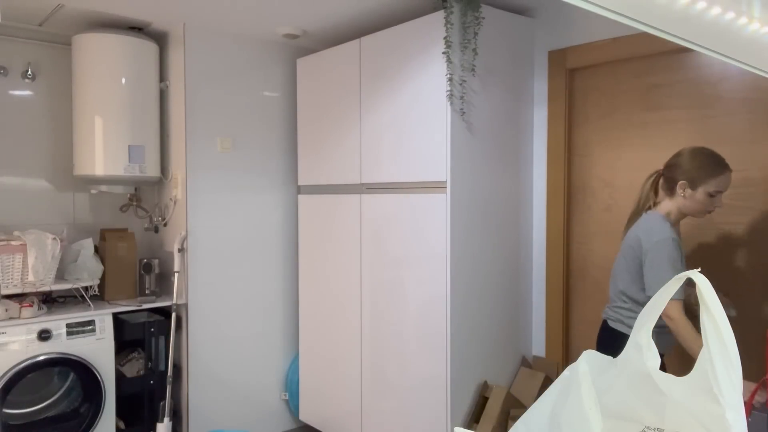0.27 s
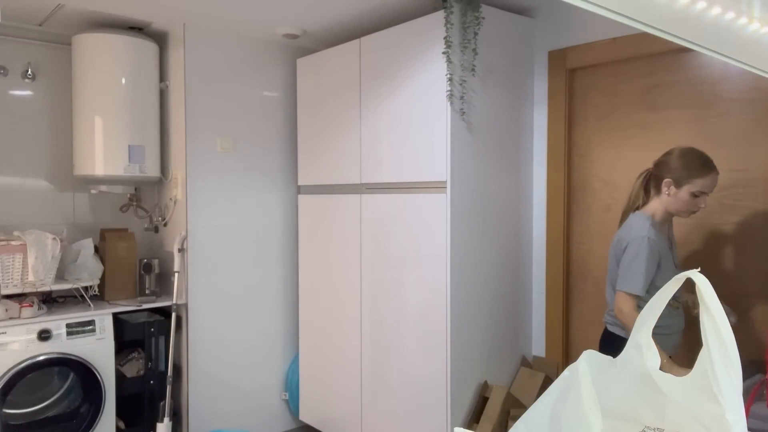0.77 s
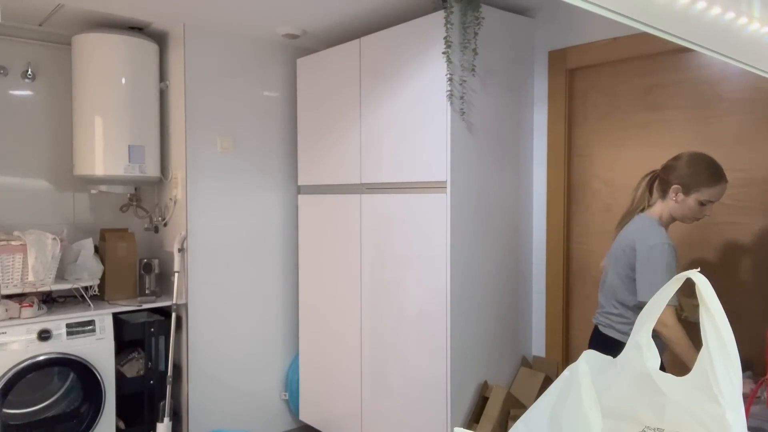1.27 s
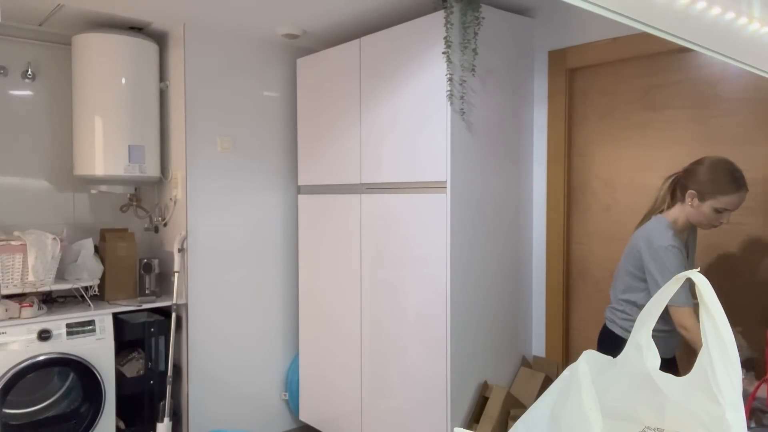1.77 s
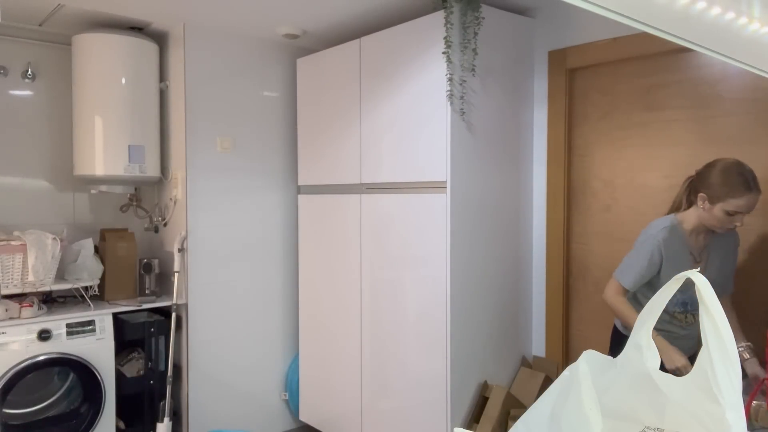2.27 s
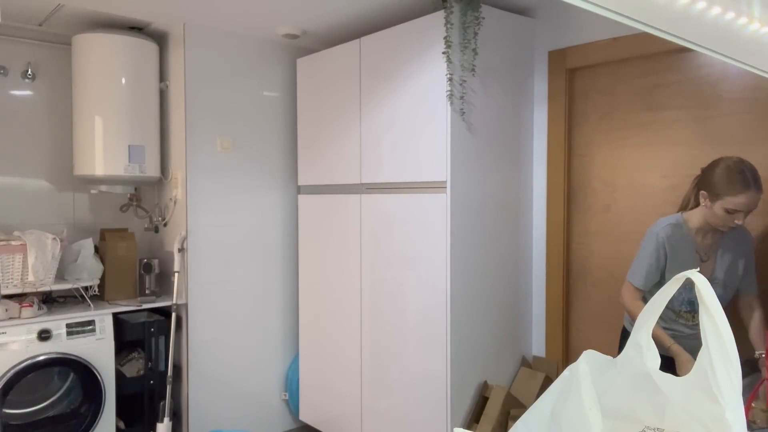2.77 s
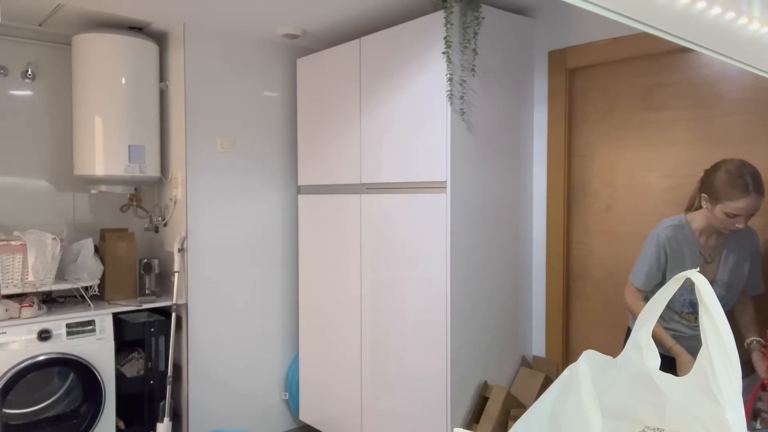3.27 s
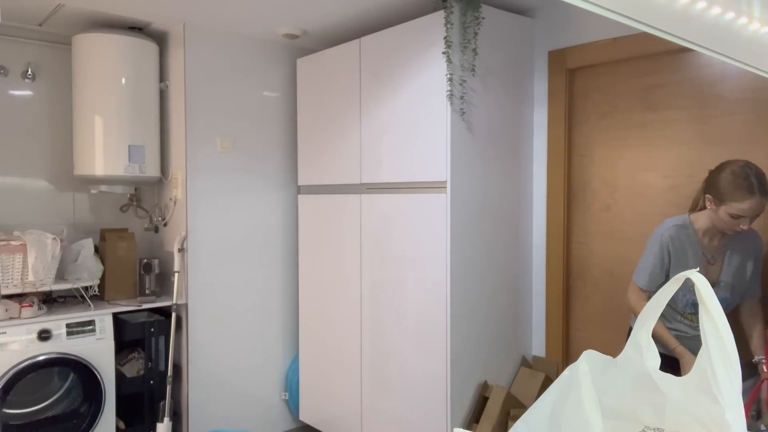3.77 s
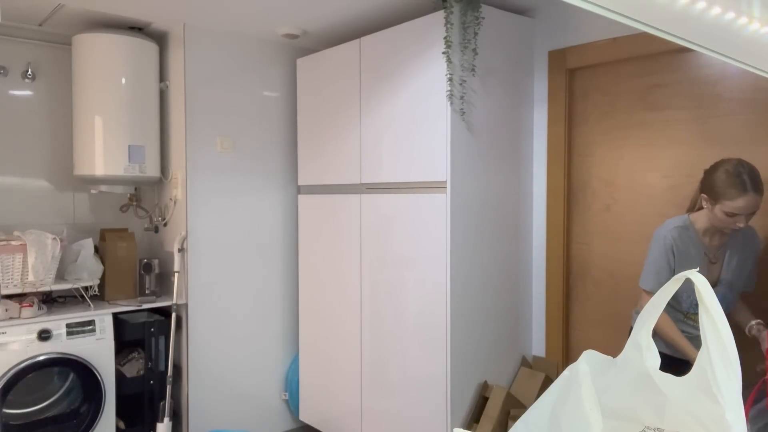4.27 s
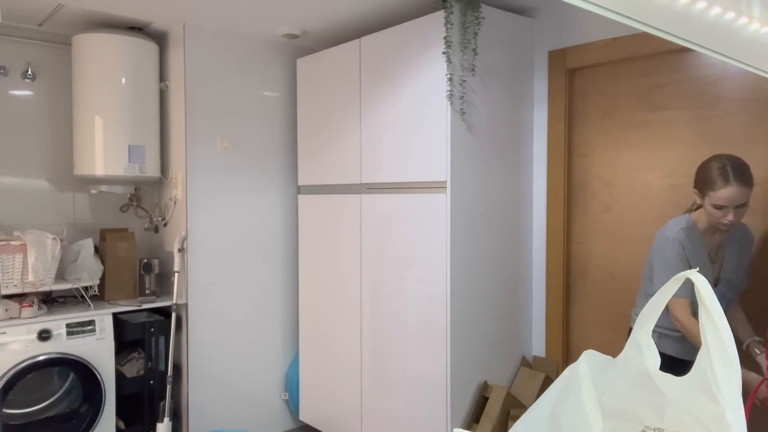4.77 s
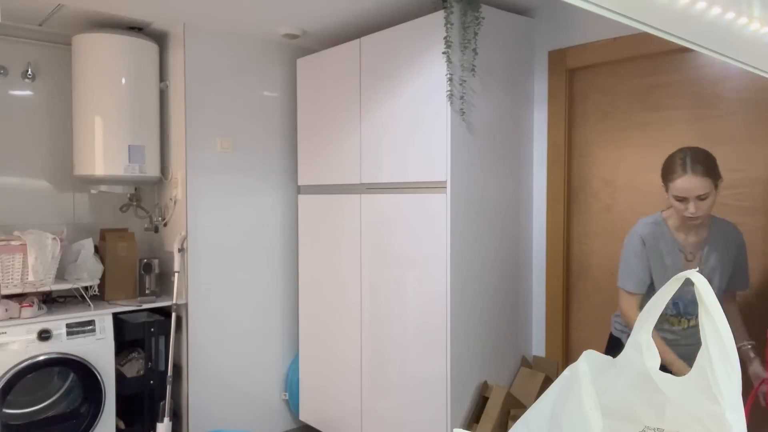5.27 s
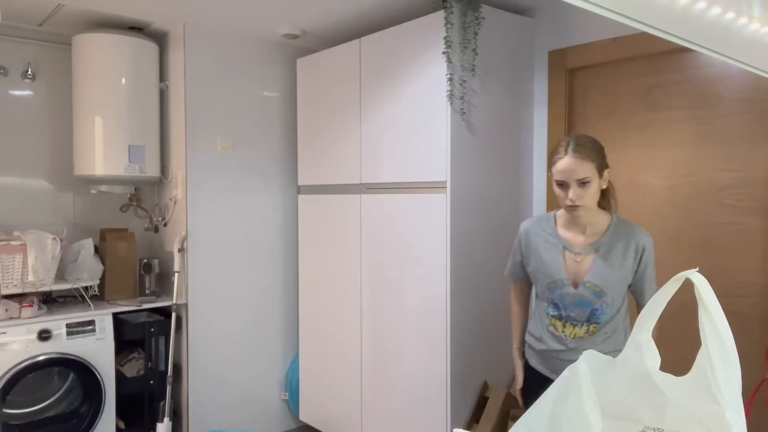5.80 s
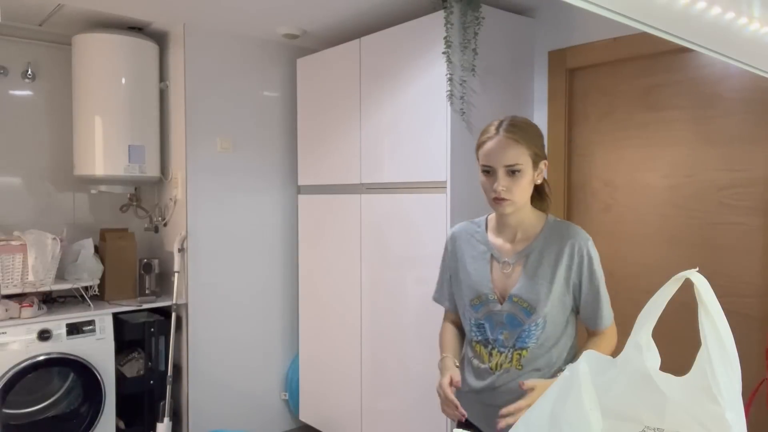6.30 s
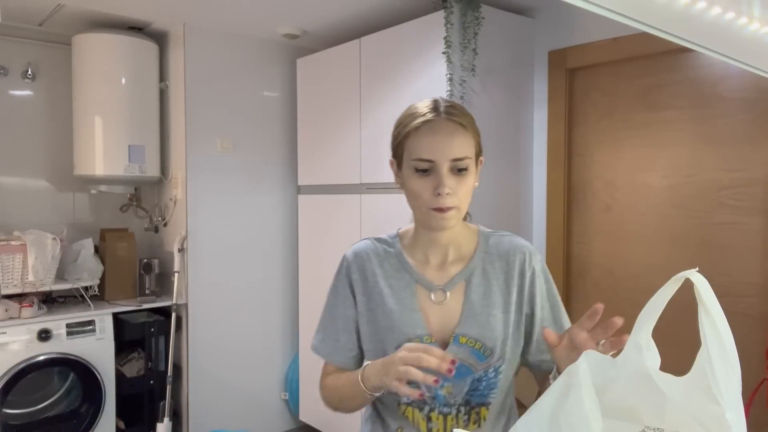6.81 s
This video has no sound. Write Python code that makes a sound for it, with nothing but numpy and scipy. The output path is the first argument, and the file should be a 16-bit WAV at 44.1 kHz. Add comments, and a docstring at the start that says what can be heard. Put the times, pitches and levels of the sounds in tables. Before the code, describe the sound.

A freezer hums and booms low in a small tiled room with a short echo, heard through a phone, slightly from the right. For the first second, plastic drawers bump and slide while frozen packets scrape lightly. From about 1.2 to 1.9 seconds comes a loud cluster of hollow knocks and scraping, sharpest at 1.5. Between 2 and 4 seconds stiff wrappers crinkle and snap in uneven bursts as they are pushed in, strongest around 3.3. A drawer knocks and rubs at about 4.3 seconds, and the hum fades. At 4.9 the door shuts with a deep, sharp thump, the loudest sound, and a brief hiss from its seal. From 5.4 seconds to the end at about 7, someone takes soft steps, with a light rustle of clothes and a plastic bag and a few very faint squeaks.

```python
"""A small tiled utility room. Stiff frozen packets crinkle and scrape as they are pushed into a freezer's
plastic drawers, which slide and knock, while the open cabinet booms low and its motor hums.
The door thumps shut on its hissing seal, and someone steps away with a rustle of clothes and faint
squeaks. The tiles add a short tail; a phone with two microphone ports listens."""
import sys
import numpy as np
from scipy import signal
from scipy.fft import rfft, irfft, next_fast_len
from scipy.io import wavfile
from scipy.ndimage import uniform_filter1d, map_coordinates

SR = 44100
rng = np.random.default_rng(int(sys.argv[2]) if len(sys.argv) > 2 else 0)


def wav_record(signal):
    """Record a signal, one row per channel, as 16-bit PCM in the file named by sys.argv[1]."""
    frames = np.transpose(np.atleast_2d(signal))
    bounded = np.clip(frames, -1, 1)
    # unit amplitude maps onto the largest positive 16-bit level
    quanta = np.round(bounded * 32767).astype(np.int16)
    wavfile.write(sys.argv[1], SR, quanta)


N = 310860

# modes of a plastic drawer: (pitch [Hz], width [Hz], level [dB])
DRAWER_MODES = [(294, 57, -1.5), (346.6, 41.6, 4.5), (393.2, 51, 4), (492, 47, 3.5), (571, 32, -0.5),
                (662, 180, -13.5)]
# low modes of the air in cabinet and room: (pitch [Hz], width [Hz], level [dB])
AIR_MODES = [(45, 12, -4.5), (57, 13.1, 0.5), (72.3, 17.8, -1.5), (102.5, 18, -5.5)]
# modes of the cabinet walls: (pitch [Hz], width [Hz], level [dB])
WALL_MODES = [(124, 25, -1.5), (147.3, 24.2, 4), (181.3, 25.5, -0.5), (256.3, 13.2, 0.5)]
# colour of a scraping packet or shoe: (frequency [Hz], level [dB])
SCRAPE_SPECTRUM = [(350, -20.5), (650, -3), (1000, 0.5), (1400, -4.5), (2000, -6.5), (3500, -17.5),
                   (8000, -45.5)]


def amp(db):
    """Gain of a level in dB."""
    return 10 ** (np.asarray(db) / 20)


def unit(x):
    """x at rms 1."""
    return x / np.sqrt(np.mean(x ** 2) + 1e-20)


def along(points, hz):
    """Read (Hz, value) points on a log frequency axis."""
    f, v = np.transpose(points)
    return np.interp(np.log(hz + 1), np.log(f + 1), v)


def curves(rows):
    """One automation curve for each column after the time."""
    times, *columns = np.transpose(rows)
    return [np.interp(np.arange(N) / SR, times, column) for column in columns]


def wobble(rate):
    """A smooth random curve, rate knots a second."""
    knots = rng.standard_normal(int(N * rate / SR) + 4)
    return map_coordinates(knots, [np.arange(N) * rate / SR])


def noise():
    """Two unrelated noises, for the mid and the side of the image."""
    return rng.standard_normal((2, N))


def filtered(x, response):
    """x times a complex response of frequency."""
    size = next_fast_len(N + SR // 2)
    return irfft(rfft(x, size) * response(np.fft.rfftfreq(size, 1 / SR)), size)[..., :N]


def coloured(x, spectrum):
    """x through a spectrum, at rms 1."""
    return unit(filtered(x, lambda hz: amp(along(spectrum, hz))))


def resonant(x, modes):
    """x through resonances of alternating sign; white noise keeps its rms."""
    def response(f):
        h = sum((-1) ** k * amp(db) * 1j * f * width / (hz * hz - f * f + 1j * f * width)
                for k, (hz, width, db) in enumerate(modes))
        return h / np.sqrt(np.mean(np.abs(h) ** 2))
    return filtered(x, response)


def patchy(x, depth_db):
    """x with random patches of gain in time and frequency."""
    spectra = signal.stft(x, nperseg=256)[2]
    field = uniform_filter1d(rng.standard_normal(spectra.shape[1:]), size=7, axis=0)
    field = uniform_filter1d(field, size=12, axis=1)
    return signal.istft(spectra * amp(depth_db * unit(field)), nperseg=256)[1][:, :N]


def burst(s, rise, t60):
    """An envelope that swells from time s and dies away, half a second at most."""
    out, start = np.zeros(N), round(s * SR)
    t = np.arange(min(SR // 2, N - start)) / SR
    out[start:start + len(t)] = (1 - np.exp(-t / rise)) * amp(-60 * t / t60)
    return out


def blows(rows):
    """Summed bursts of (time [s], levels [dB], rise [s], t60 [s]) rows, one envelope per level."""
    return sum(amp(db)[:, None] * burst(s, rise, t60) for s, db, rise, t60 in rows)


def room_tone():
    """A steady, dark bed of noise."""
    # colour of the bed: (frequency [Hz], level [dB])
    spectrum = [(18, -34.5), (30, -5.5), (86, -6.5), (304, -32), (350, -18), (424, -36), (490, -34.5),
                (1270, -46.5), (1910, -46), (2480, -53.5), (9000, -62), (11700, -77.5), (19800, -120)]
    return amp(-46.5) * coloured(noise(), spectrum)


def cabinet():
    """Movement stirs the low air and the walls, the motor hums unevenly, runners rumble in the drawer."""
    # shaking by drawers and feet: (time [s], air boom [dB], wall drone [dB], drawer rumble [dB])
    shaking = [(0.0, -25.5, -41, -33.5), (0.41, -42, -32.5, -35), (0.59, -36, -29.5, -28.5),
               (0.75, -35, -46.5, -44.5), (1.2, -35, -45, -62.5), (1.37, -41.5, -38.5, -39),
               (1.6, -35.5, -31.5, -38), (1.9, -35, -53.5, -71.5), (2.14, -36, -42, -40),
               (2.5, -38, -49, -53.5), (2.86, -34, -39.5, -39.5), (3.04, -35, -45.5, -48),
               (3.67, -35, -40.5, -38.5), (3.98, -38, -43.5, -41.5), (4.2, -39.5, -32, -38),
               (4.29, -35.5, -30, -34.5), (4.34, -28, -22.5, -37.5), (4.45, -35, -45, -37.5),
               (4.67, -35, -37.5, -41.5), (4.88, -34.5, -46, -40.5), (5.0, -34.5, -34.5, -51),
               (5.07, -20.5, -39.5, -56), (5.12, -31.5, -48, -66), (5.3, -38.5, -52.5, -67),
               (5.52, -50, -51, -62.5), (6.3, -48, -47, -59.5), (7.05, -71, -51, -68.5)]
    boom_db, drone_db, rumble_db = curves(shaking)
    hum_hz, wander_hz, hum_end_s, fade_s = 76, 3.48, 4.44, 0.45
    hum_share = 0.96 * np.clip((hum_end_s - np.arange(N) / SR) / fade_s, 0, 1)
    hum = np.sqrt(2) * np.sin(2 * np.pi * np.cumsum(hum_hz + wander_hz * wobble(11)) / SR)
    boom_gain = amp(boom_db + 0.97 * wobble(25))
    boom = boom_gain * (hum_share * hum + np.sqrt(1 - hum_share ** 2) * resonant(noise(), AIR_MODES))
    drone = amp(drone_db + 2.5 * wobble(25)) * resonant(noise(), WALL_MODES)
    rumble = amp(rumble_db + 2.6 * wobble(30)) * resonant(noise(), DRAWER_MODES)
    return boom + drone + rumble


def grips():
    """Crinkle, scrape and fizz envelopes: each grip swells, holds and lets go, and their powers add."""
    # handling of packets, later of clothes and bag:
    # (start [s], rise [s], hold [s], crinkle [dB], scrape [dB], fizz [dB])
    gestures = [(0.0, 0.00057, 0.028, -48, -34.5, -51), (0.092, 0.071, 0.14, -53, -41.5, -55.5),
                (0.252, 0.0027, 0.033, -37, -34, -43.5), (0.349, 0.034, 0.13, -85, -44.5, -64),
                (0.534, 0.036, 0.0025, -36.5, -30.5, -35.5), (0.705, 0.095, 0.066, -57.5, -47.5, -64.5),
                (0.914, 0.0044, 0.062, -58, -47, -74.5), (1.0, 0.037, 0.19, -68, -55, -72.5),
                (1.187, 0.044, 0.022, -48.5, -36.5, -65.5), (1.226, 0.055, 0.14, -38.5, -31.5, -42.5),
                (1.294, 0.048, 0.0055, -35.5, -27, -33), (1.448, 0.018, 0.027, -24, -15.5, -37.5),
                (1.62, 0.024, 0.015, -44.5, -49, -44.5), (1.72, 0.12, 0.012, -44.5, -37, -57.5),
                (1.966, .02, 0.057, -42, -53.5, -51), (2.079, 0.036, 0.15, -36, -40, -37),
                (2.13, 0.098, 0.036, -25.5, -32, -29.5), (2.456, 0.027, 0.018, -41.5, -48.5, -37),
                (2.485, 0.088, 0.002, -37.5, -42, -41.5), (2.602, 0.11, 0.065, -35, -40, -35),
                (2.72, 0.079, 0.19, -31.5, -38.5, -31.5), (3.018, 0.0062, 0.14, -38.5, -53, -38.5),
                (3.138, 0.17, 0.0037, -32, -38, -29), (3.281, 0.083, 0.0048, -24, -29, -24.5),
                (3.459, 0.12, 0.079, -27.5, -33.5, -26), (3.735, 0.041, 0.16, -33, -38, -35.5),
                (3.908, 0.053, 0.11, -38.5, -42.5, -41.5), (4.061, 0.032, 0.15, -48.5, -41.5, -56.5),
                (4.251, 0.081, 0.03, -39, -35.5, -40.5), (4.391, 0.015, 0.24, -37.5, -38, -41.5),
                (4.586, 0.011, 0.28, -40.5, -37, -41.5), (4.872, 0.016, 0.038, -34.5, -29, -76),
                (4.947, 0.017, 0.08, -67, -61.5, -74), (5.423, 0.0045, 0.072, -62.5, -58, -78.5),
                (5.553, 0.0091, 0.11, -64, -71, -60), (5.738, 0.041, 0.13, -64, -62, -61.5),
                (5.891, .02, 0.044, -62.5, -61, -66), (5.975, 0.036, 0.075, -59.5, -48, -55),
                (6.104, 0.0082, 0.086, -62, -54.5, -67), (6.221, 0.0057, 0.12, -66.5, -60, -64),
                (6.444, 0.048, 0.26, -80, -62, -73), (6.63, 0.12, 0.054, -57.5, -48, -66.5),
                (6.837, 0.022, 0.08, -60.5, -56, -61.5), (6.976, 0.013, .06, -58, -57, -48)]
    rest_db, release_db_per_s = (-80, -68.5, -76), (118.5, 149.5, 161)  # crinkle, scrape, fizz
    t = np.arange(0, N / SR, 0.001)
    power = amp(rest_db)[:, None] ** 2
    for s, rise, hold, *db in gestures:
        fade_db = np.outer(release_db_per_s, np.clip(t - s - rise - hold, 0, None))
        swell = np.clip((t - s) / max(rise, 1e-3), 0, 1) ** 2
        power = power + (swell * amp(np.array(db)[:, None] - fade_db)) ** 2
    return [np.interp(np.arange(N) / SR, t, layer) for layer in np.sqrt(power)]


def packets():
    """Frozen film buckles in dense, uneven clumps of clicks; heavy packets scrape."""
    # single snaps of the film: (time [s], level [dB])
    snap_cues = [(0.249, -38), (0.9217, -62), (0.5405, -48), (0.562, -46), (1.3166, -38.5), (1.4667, -31.5),
                 (1.9808, -48.5), (2.11, -43), (2.1997, -35), (2.4523, -45), (2.464, -37.5), (2.541, -33),
                 (2.6656, -46), (2.709, -36), (3.041, -29.5), (3.139, -49), (3.2123, -33.5), (3.545, -38),
                 (3.868, -38.5), (4.2923, -44), (4.414, -46), (4.8877, -43), (5.095, -55), (5.9836, -58),
                 (6.9842, -63.5)]
    # colour of the crinkle: (frequency [Hz], level [dB])
    film_spectrum = [(900, -27.5), (1500, -0.5), (2200, 4), (4000, 2.5), (7000, 0.5), (9000, -6.5),
                     (11000, -28)]
    # colour of the top-octave fizz: (frequency [Hz], level [dB])
    fizz_spectrum = [(7500, -13.5), (10000, -2.5), (11500, -5), (14000, -10), (16000, -6.5)]
    # each packet has its own brightness: (time [s], treble over middle [dB])
    brightness = [(0.0, 9.5), (0.25, 2), (0.55, 5.5), (0.75, 0), (0.95, -9.5), (1.15, -3), (1.3, 2.5),
                  (1.5, -1), (1.8, 2.5), (2.0, -0.5), (2.25, 0), (2.46, -1.5), (2.55, 8.5), (2.65, 2),
                  (2.8, 2.5), (3.0, 4), (3.15, 0), (3.25, 7.5), (3.37, -1.5), (3.5, 6), (3.65, -1.5),
                  (3.9, -1), (4.2, 2), (4.42, 0.5), (4.5, 5), (4.9, 1), (5.5, -2.5), (6.2, 2.5), (7.05, 2)]
    crossover_hz = 3800
    crinkle, scrape, fizz = grips()
    clicks = patchy(noise() * amp(0.9 * rng.exponential(size=N)), depth_db=1.3)
    snaps, = blows([(s, [db], 0.0008, 0.05) for s, db in snap_cues])
    buckling = amp(0.3 * wobble(25) + 0.19 * wobble(140)) + snaps / crinkle
    body = coloured(clicks, film_spectrum)
    middle = filtered(body, lambda hz: 1 / (1 + (hz / crossover_hz) ** 4))
    tilt_db, = curves(brightness)
    tinted = amp(-tilt_db / 2) * middle + amp(tilt_db / 2) * (body - middle)
    film = buckling * (crinkle * tinted + fizz * coloured(clicks, fizz_spectrum))
    drag = scrape * amp(0.52 * wobble(50))
    return film + drag * coloured(patchy(noise(), depth_db=1.5), SCRAPE_SPECTRUM)


def knocks():
    """A firm, rough push shakes drawer and walls, moves the low air, and slaps and rings the front."""
    # packets and drawers landing, soft packets more slowly:
    # (time [s], drawer [dB], walls [dB], slap [dB], thud [dB], rise [s])
    hits = [(0.041, -31.5, -21.5, -46, -32.5, 0.0016), (0.122, -36, -38, -35, -16, 0.0018),
            (0.127, -33.5, -39, -42, -9.5, 0.015), (0.213, -33.5, -25, -44.5, -14, 0.0045),
            (0.2508, -34, -45, -25, -35, 0.001), (0.363, -20.5, -27, -36, -23.5, 0.0025),
            (0.462, -29, -31, -37.5, -28, .001), (0.497, -31, -37, -33.5, -36, 0.0051),
            (0.564, -21.5, -35, -44.5, -29, 0.0012), (0.7, -30.5, -18.5, -35.5, -28.5, 0.0022),
            (0.921, -58, -40.5, -42.5, -35, 0.003), (1.195, -24, -37, -34, -35, 0.0055),
            (1.279, -14.5, -15.5, -35, -12.5, 0.011), (1.303, -10.5, -22.5, -28, -22, 0.0013),
            (1.314, -13.5, -18, -14.5, -22, 0.0037), (1.334, -9.5, -15.5, -31.5, -7, 0.017),
            (1.407, -33.5, -21, -38.5, -18.5, 0.0082), (1.461, -1.5, -23.5, -14, -22.5, 0.0015),
            (1.469, -6.5, -20, -10, -24, 0.0034), (1.485, -13.5, -24, -6.5, -22, 0.0029),
            (1.498, -13, -23, -16, -28.5, 0.0013), (1.507, -15, -22.5, -20.5, -37, 0.00088),
            (1.524, -34, -35.5, -19, -27, 0.002), (1.612, -32, -40.5, -26.5, -36.5, 0.0016),
            (1.764, -17.5, -18, -35.5, -17, 0.0098), (1.803, -21.5, -18, -37, -37.5, 0.0064),
            (1.813, -20.5, -17, -33.5, -28.5, 0.0022), (1.821, -25.5, -25.5, -26, -38.5, 0.00061),
            (1.838, -16, -30, -36, -33.5, 0.0045), (2.209, -19, -18.5, -18.5, -28, 0.04),
            (2.738, -25.5, -28, -31.5, -28, 0.1), (3.307, -16, -17, -27, -33.5, 0.037),
            (3.352, -33.5, -25.5, -14, -20.5, 0.019), (3.598, -31, -24, -21, -29, 0.066),
            (3.644, -28.5, -40.5, -36, -34, 0.00093), (3.796, -35.5, -25.5, -31.5, -42, 0.032),
            (4.286, -29.5, -23, -28.5, -24, 0.002), (4.31, -26, -8.5, -25.5, -20.5, 0.0025),
            (4.32, -20, -18.5, -39, -23, 0.0016), (4.34, -21.5, -19.5, -24.5, -23, 0.0029),
            (4.363, -22.5, -36.5, -30, -28, 0.0032), (4.386, -24.5, -16.5, -28, -48, 0.002),
            (4.409, -28.5, -21.5, -37, -24, 0.0025), (4.426, -38, -24, -27, -30, 0.0039),
            (4.505, -34, -32.5, -56, -24, 0.0027), (4.885, -33, -12.5, -39, -20.5, 0.0034),
            (4.898, -17, -22, -23.5, -16, 0.0021), (4.964, -43, -32, -45, -19, 0.0019)]
    # modes of the drawer front: (pitch [Hz], width [Hz], level [dB])
    front_modes = [(760, 23, -13), (893, 26, -6), (1004, 23, 9.5), (1140, 40, -13), (1370, 50, -9.5),
                   (1690, 110, -16), (2050, 56, -6), (2494, 60, -9)]
    # colour of the slap: (frequency [Hz], level [dB])
    slap_spectrum = [(450, -11), (650, 6.5), (800, 24.5), (1000, 20), (1300, 12), (2000, -6), (4000, -21.5),
                     (9000, -39.5), (16000, -28.5)]
    contact_t60_s, t60_per_rise = 0.054, 4  # the slower the push, the longer the contact
    contacts = [(s, db, rise, contact_t60_s + t60_per_rise * rise) for s, *db, rise in hits]
    push, shake, slap, thud = blows(contacts)
    rough, firm = noise(), np.array([[1], [-0.6]])  # mid and side: the push is heard from the right
    drawer = resonant(push * (rough + 2.1 * firm), DRAWER_MODES)
    walls = resonant(shake * (rough + 0.47 * firm), WALL_MODES)
    air = resonant(thud * (rough + 0.5 * firm), AIR_MODES)
    front = amp(-6.5) * resonant(slap * noise(), front_modes)
    return drawer + walls + air + front + slap * coloured(noise(), slap_spectrum)


def gasket():
    """Air hisses past the door seal."""
    # rushes of air: (time [s], level [dB], t60 [s])
    rushes = [(0.527, -38, 0.45), (4.887, -29, 0.35)]
    # band of the hiss: (centre [Hz], width [Hz], level [dB])
    hiss_band = [(5730, 1600, 0)]
    flow = sum(amp(db) * burst(s, rise=0.03, t60=t60) for s, db, t60 in rushes)
    return flow * resonant(resonant(noise(), hiss_band), hiss_band)


def brief_resonances():
    """Brief bands of resonant noise: rubs, a dull tap, ringing footfalls and faint low tones."""
    # noise bands: (time [s], rise [s], t60 [s], pitch [Hz], width [Hz], level [dB])
    bands = [(0.92, 0.0033, .25, 2100, 1350, -49), (1.245, 0.0057, .08, 1100, 201.5, -41),
             (4.41, .04, 0.38, 2400, 350, -33), (4.415, .02, 0.31, 930, 91.3, -38.5),
             (4.61, .015, .1, 1310, 246, -38.5), (4.9, 0.0082, .15, 2310, 310, -33.5),
             (5.43, .008, 0.12, 1550, 200, -52), (5.575, .015, 0.23, 850, 200, -52.5),
             (6.255, 0.018, .4, 506, 25, -52), (6.5, 0.073, 0.94, 345, 13, -48),
             (6.765, 0.012, 0.17, 850, 72, -47)]
    return sum(resonant(amp(db) * burst(s, rise, t60) * noise(), [(hz, width, 0)])
               for s, rise, t60, hz, width, db in bands)


def catch():
    """A catch clicks: a short rattle rings its hard plastic."""
    # upper modes of the catch: (pitch [Hz], width [Hz], level [dB])
    upper_modes = [(2580, 500, 0), (3980, 650, 5.5), (4840, 800, 0), (6620, 500, -14.5)]
    low_mode = (1900, 600, -4)
    rattle = amp(-30.5) * burst(1.2262, rise=0.0015, t60=0.11) * noise()
    return resonant(rattle, upper_modes + [low_mode])


def door():
    """The panel lands and rings lower as trapped air escapes; it jolts its inner skin, walls and air."""
    shut_s, first_hz, last_hz, glide_s, skin_hz = 4.9035, 120, 65, 0.012, 150
    t = np.clip(np.arange(N) / SR - shut_s, 0, None)
    cycles = last_hz * t + (first_hz - last_hz) * glide_s * (1 - np.exp(-t / glide_s))
    panel = amp(12) * burst(shut_s, rise=0.025, t60=0.16) * np.sin(2 * np.pi * cycles)
    skin = amp(-12.5) * burst(shut_s, rise=0.0045, t60=0.34) * np.sin(2 * np.pi * skin_hz * t)
    contact = burst(shut_s - 0.006, rise=0.0051, t60=0.14) * noise()
    jolt = amp(-13.5) * resonant(contact, WALL_MODES + DRAWER_MODES)
    air = amp(-7) * resonant(burst(shut_s, rise=0.074, t60=0.25) * noise(), AIR_MODES)
    return panel + skin + jolt + air


def steps():
    """Each step rings the floor, moves the low air, taps the sole and scuffs."""
    # footfalls: (time [s], floor [dB], tap [dB], scuff [dB], thud [dB])
    footfalls = [(5.431, -29, -46, -51, -31), (5.514, -54, -63, -60, -31), (5.569, -32.5, -44, -61.5, -34),
                 (5.777, -52, -50, -68, -30.5), (5.862, -42, -59, -63, -33), (5.925, -48, -52, -51, -43),
                 (5.979, -21.5, -34.5, -42, -48), (6.102, -24, -45.5, -61, -28),
                 (6.218, -39.5, -44, -44, -51), (6.638, -59, -71, -63, -47), (6.661, -58, -63, -67, -48),
                 (6.692, -23.5, -64, -66, -33), (6.779, -38, -51, -55, -49)]
    # modes of the floor under a shoe: (pitch [Hz], width [Hz], level [dB])
    floor_modes = [(182, 100, -9), (252.6, 21, 5.5), (298, 31, -6), (363, 22, -5.5), (517, 50, -12.5)]
    # modes of the hard sole: (pitch [Hz], width [Hz], level [dB])
    sole_modes = [(600, 33, -12), (734, 65, 10), (880, 93, 5), (1100, 60, 3), (1450, 79, -8)]
    step_rise_s, step_t60_s, tap_rise_s, tap_t60_s = 0.0032, 0.067, 0.0008, 0.092
    floor, _, scuff, thud = blows([(s, db, step_rise_s, step_t60_s) for s, *db in footfalls])
    tap, = blows([(s, [db], tap_rise_s, tap_t60_s) for s, _, db, *_ in footfalls])
    rough = noise()
    weight = resonant(floor * (0.98 * rough + 0.56), floor_modes) + resonant(thud * rough, AIR_MODES)
    return weight + resonant(tap * rough, sole_modes) + scuff * coloured(rough, SCRAPE_SPECTRUM)


def squeaks():
    """Faint, thin, unsteady tones fade in and out."""
    # one contour for each squeak: (time [s], pitch [Hz], level [dB])
    contours = [
        [(5.61, 1235, -66), (5.7, 1230, -61), (5.765, 1260, -59)],
        [(5.765, 1210, -51), (5.815, 1230, -53)],
        [(5.8, 1520, -68), (5.9, 1740, -63)],
        [(6.5, 1700, -66), (6.6, 1700, -66)],
    ]
    fade_s, wander_hz = 0.019, 22
    t, out = np.arange(N) / SR, 0
    for rows in contours:
        hz, db = curves(rows)
        swell = np.clip(np.minimum(t - rows[0][0], rows[-1][0] - t) / fade_s, 0, 1)
        gain = swell * amp(db + 2.2 * wobble(77))
        out = out + gain * np.sin(2 * np.pi * np.cumsum(hz + wander_hz * wobble(150)) / SR)
    return out


def tiled_reverb(send):
    """Each frequency of the room's tail dies at its own speed."""
    # decay of the room: (frequency [Hz], t60 [s])
    decay = [(100, 0.45), (500, 0.37), (2000, 0.39), (8000, 0.048), (16000, 0.17)]
    # the tiles return less of the low middle: (frequency [Hz], level [dB])
    return_eq = [(60, -1), (130, -4), (400, -6.5), (900, -1.5), (3000, -0.5)]
    hz, t, spectra = signal.stft(rng.standard_normal((2, SR // 2)), SR, nperseg=256)
    tail = signal.istft(spectra * amp(-60 * t / along(decay, hz)[:, None]), SR, nperseg=256)[1]
    wet = signal.fftconvolve(send, tail / np.linalg.norm(tail[0]), axes=1)[:, :N]
    return filtered(wet, lambda f: amp(along(return_eq, f)))


def stereo_image(mid_side):
    """Mid and side become left and right, each frequency with its own width and lean."""
    # stereo width: bass centred, middle diffuse, treble at 9-13 kHz opposite in left and right:
    # (frequency [Hz], side over mid [dB])
    width = [(60, -25.5), (110, -19.5), (200, -7.5), (380, 3.5), (700, 2.5), (2400, -0.1), (8800, 1.7),
             (9400, 27.5), (12900, 90.5), (13500, 0), (16000, 7.5)]
    # stereo balance: (frequency [Hz], left over right [dB])
    balance = [(110, -0.7), (200, -2), (380, -6), (700, -1.5), (2400, 1.4), (5000, -0.5)]
    left_lag_s, direct_share, direct_top_hz = 0.00053, 0.74, 2100  # sound comes from the right
    size = next_fast_len(N + SR // 2)
    hz = np.fft.rfftfreq(size, 1 / SR)
    spread = np.arctan(amp(along(width, hz)))
    lag_shape = np.clip(3 * np.sin(2 * np.pi * hz * left_lag_s), -1, 1)
    direct = lag_shape * direct_share / (1 + (hz / direct_top_hz) ** 4)
    centre, diffuse = np.sqrt(2) * rfft(mid_side, size)
    mid = centre * np.cos(spread)
    # a delay between left and right puts the side a quarter cycle behind the mid
    side = (np.sqrt(1 - direct ** 2) * diffuse - 1j * direct * centre) * np.sin(spread)
    lean = amp(along(balance + [(8500, 0)], hz) / 2)
    return irfft([(mid + side) * lean, (mid - side) / lean], size)[:, :N]


def scene():
    """The stereo mix; only rustle and hits feed the reverb."""
    rustle = packets()
    hits = knocks() + steps() + catch() + brief_resonances()
    wet = tiled_reverb(amp(-12.5) * rustle + amp(-4.0) * hits)
    return stereo_image(rustle + hits + wet + cabinet() + door() + gasket() + squeaks() + room_tone())


def record(dry):
    """The phone loses the deepest bass, soft-clips at full scale and cuts all above its band limit."""
    low_cut_hz, top_hz = 33, 16050
    heard = filtered(dry, lambda hz: 1 / (1 + (low_cut_hz / (hz + 1)) ** 4))
    clipped = heard / (1 + np.abs(heard) ** 12) ** (1 / 12)
    return filtered(clipped, lambda hz: hz < top_hz)


dry = scene()
out = record(dry)
wav_record(out)
```